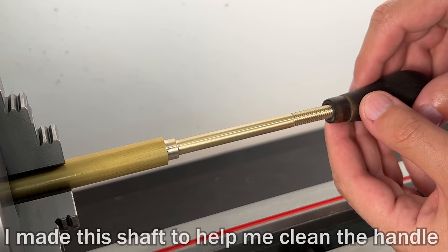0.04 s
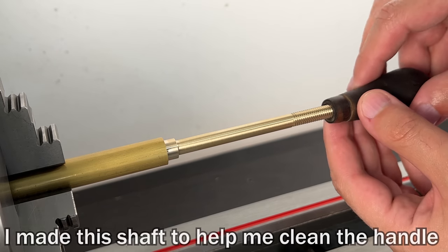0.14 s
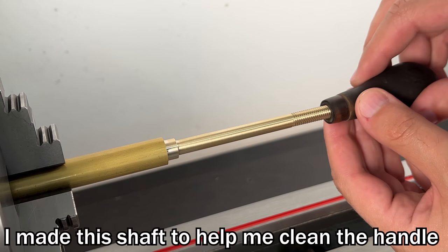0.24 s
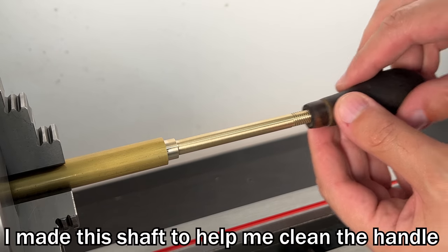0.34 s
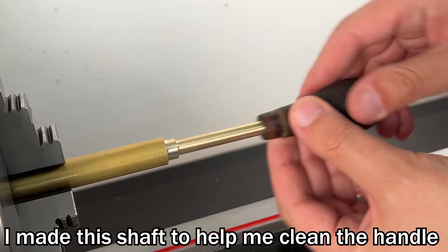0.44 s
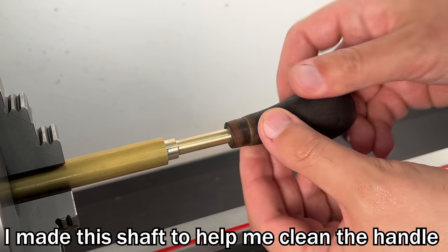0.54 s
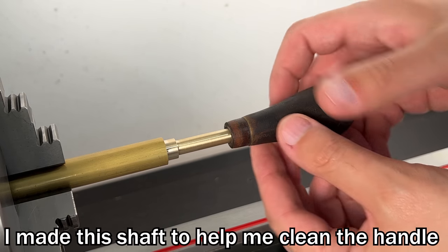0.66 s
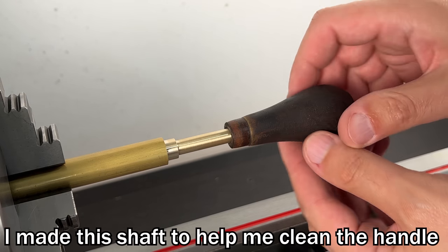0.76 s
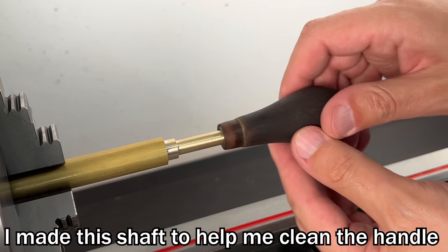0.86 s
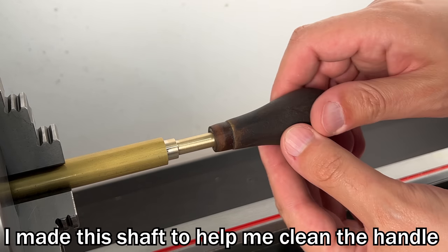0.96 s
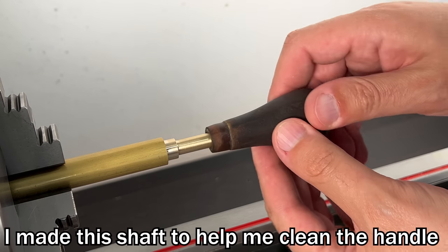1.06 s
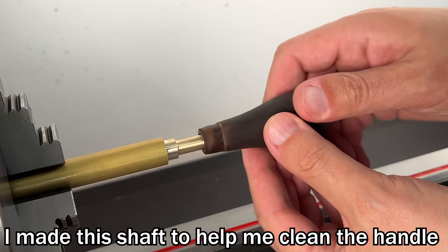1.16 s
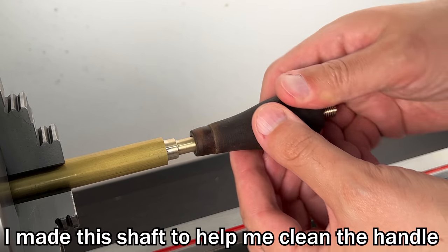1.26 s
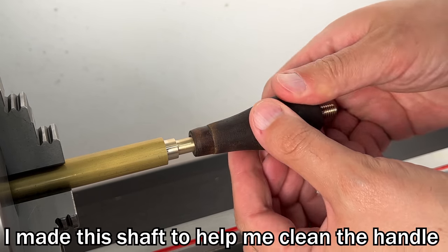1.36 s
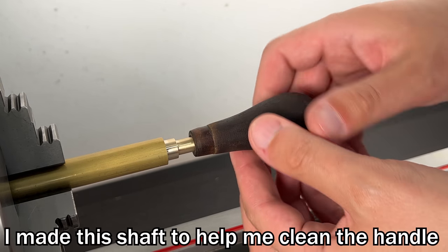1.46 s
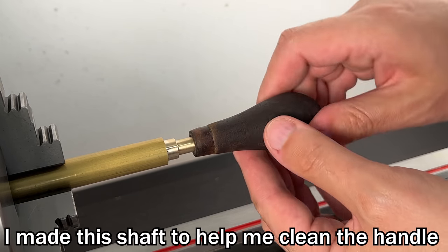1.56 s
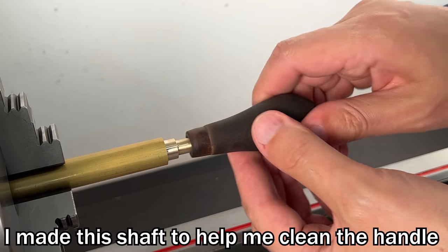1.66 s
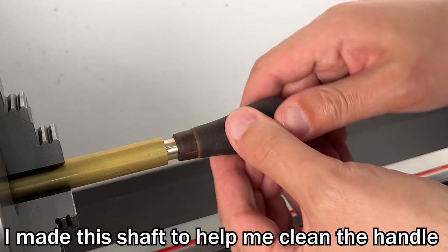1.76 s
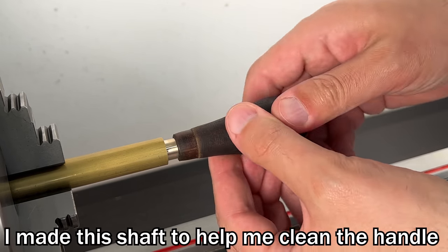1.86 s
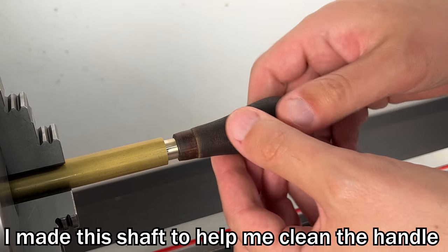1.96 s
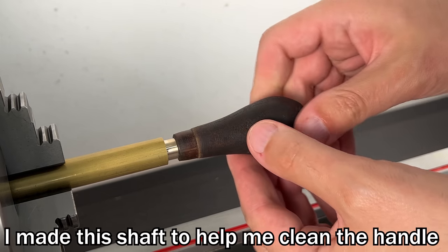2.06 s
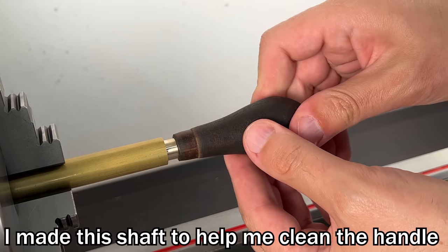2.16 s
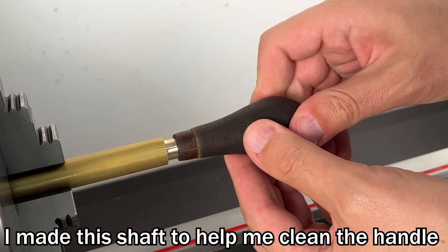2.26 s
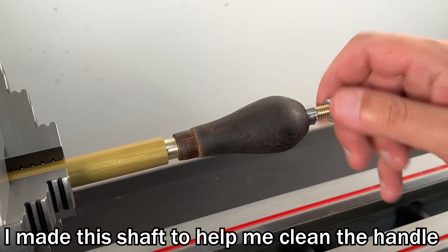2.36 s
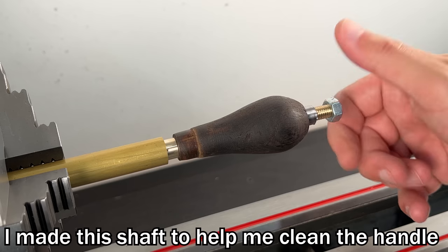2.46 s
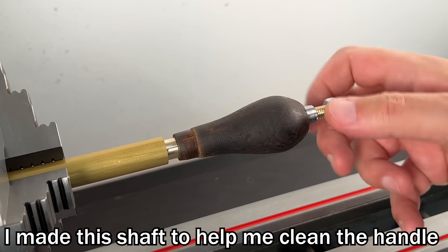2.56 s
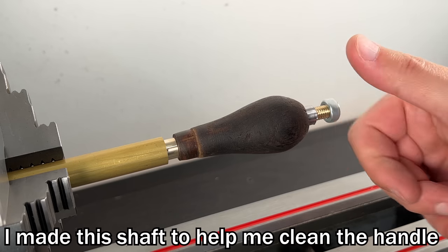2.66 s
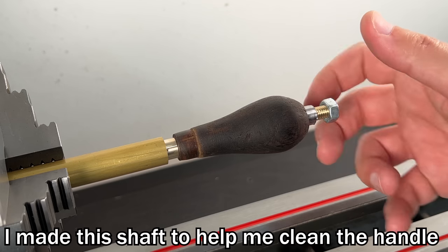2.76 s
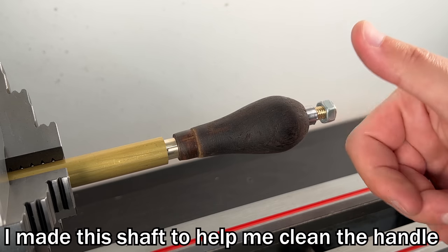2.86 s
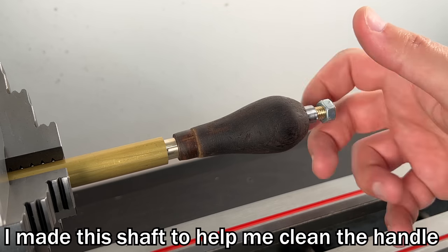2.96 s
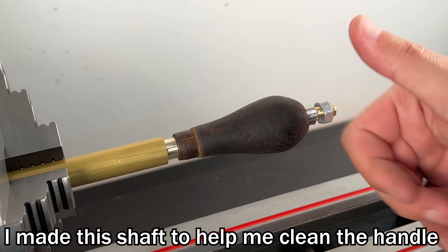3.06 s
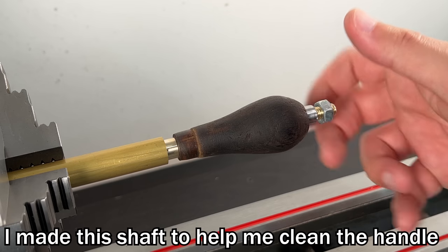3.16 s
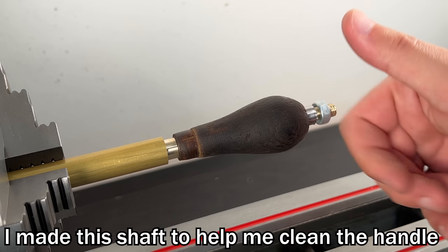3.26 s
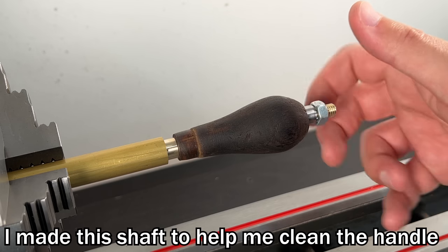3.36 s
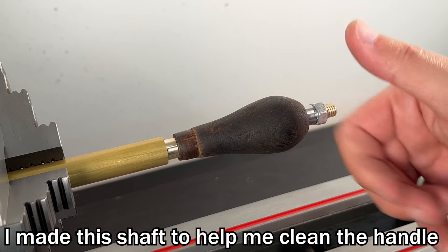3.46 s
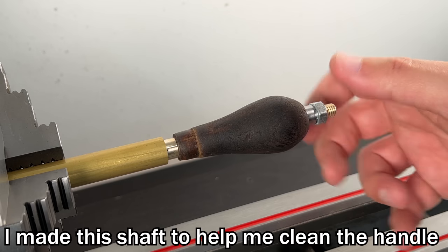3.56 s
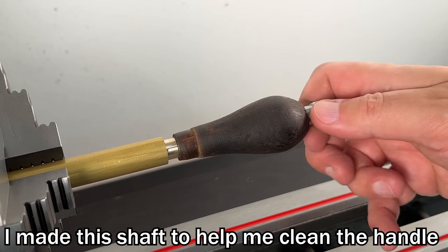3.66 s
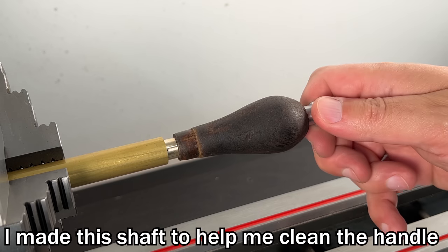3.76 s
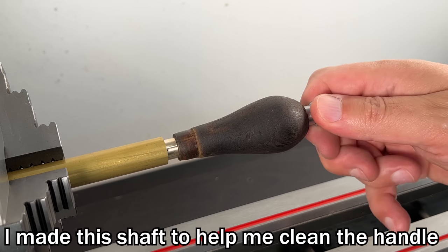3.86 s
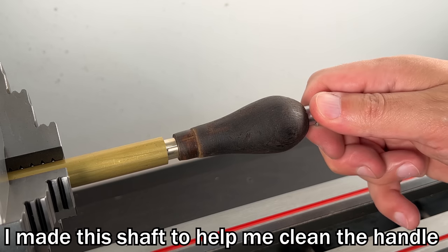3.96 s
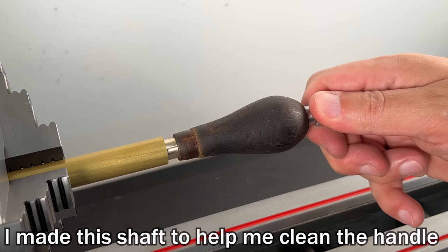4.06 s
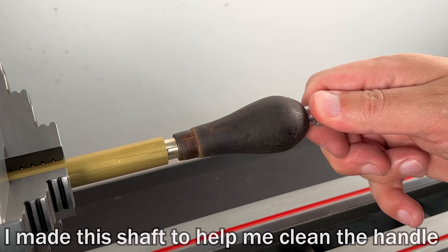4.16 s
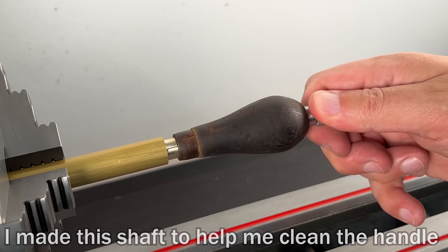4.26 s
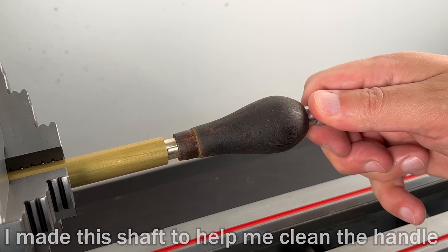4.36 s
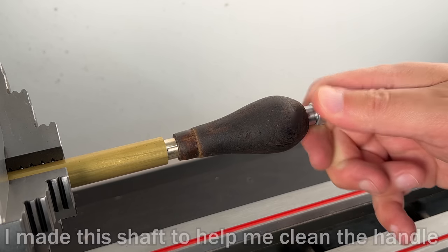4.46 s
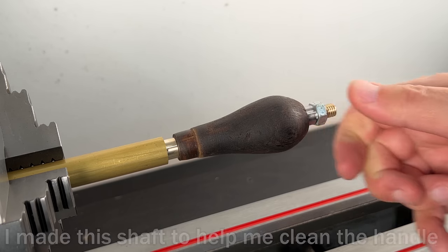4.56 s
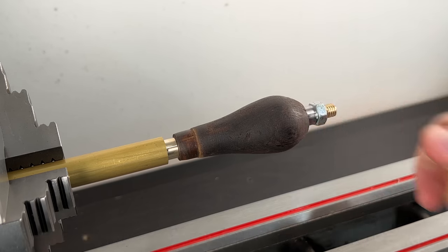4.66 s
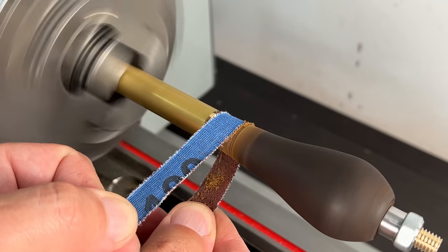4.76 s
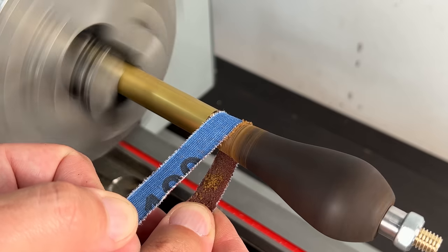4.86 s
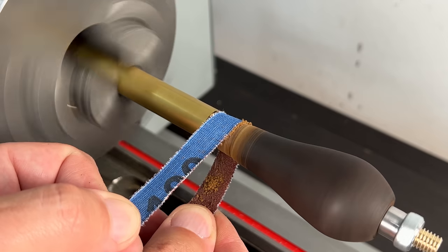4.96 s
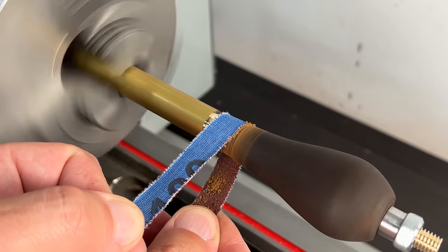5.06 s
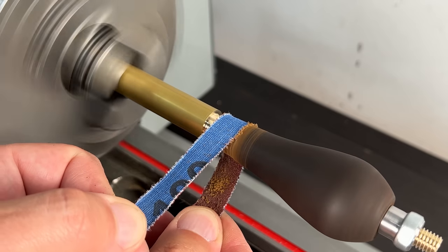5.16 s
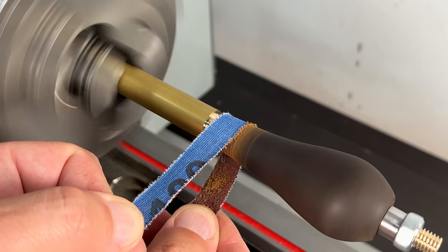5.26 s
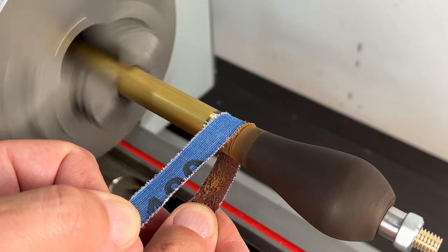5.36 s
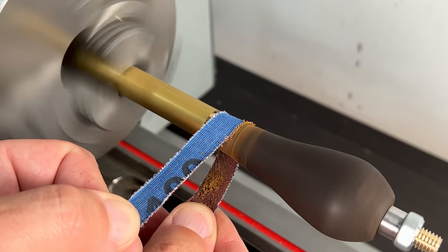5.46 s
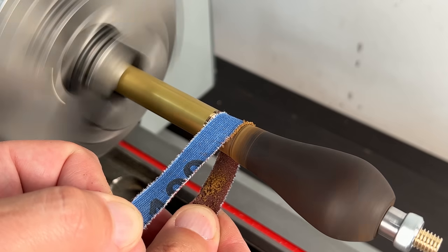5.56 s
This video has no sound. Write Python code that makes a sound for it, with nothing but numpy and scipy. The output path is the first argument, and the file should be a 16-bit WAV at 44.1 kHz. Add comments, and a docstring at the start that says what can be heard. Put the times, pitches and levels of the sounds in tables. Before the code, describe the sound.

A close, dry small-workshop sound with short reflections and faint low air noise. At 0-0.1 s the wooden handle gives soft hollow taps; from 0.3 to about 0.6 s it scrapes along the brass thread, growing hollower, then stops. Light skin rubs and dull wooden knocks follow around 0.9, 1.1-1.3 and 1.5 s. Two firmer knocks at 1.74 and 1.83 s seat it, with a tiny grind and low thud; a dry snap comes at 2.05 s. From 2.4 s a steel nut ticks and chatters on the thread, bright and ringing, in irregular flicks, strongest around 2.65-3.15 s with two brief rattles and low shaft rings, thinning out by 3.5 s. Near quiet follows, with faint bumps at 3.8-4.4 s. From about 4.7 s sandpaper rasps and hisses continuously against the spinning handle, swelling to 5.35 s with harsher bites, a thin singing edge, bearing rumble and low hum, still running at the end.

```python
"""A wooden handle scrapes along a threaded brass shaft and knocks home: filtered grains and ringing modes.
A flicked steel nut ticks and chatters on the thread, and each hit rings and bends the shaft.
Then a lathe swells in: sandpaper rasps as filtered grains over bearing rumble and a sine motor hum.
A small workshop adds close reflections and a short tail, over faint air noise.
"""
import sys
import numpy as np
from scipy import signal
from scipy.fft import rfft, irfft
from scipy.io import wavfile
from scipy.ndimage import uniform_filter1d, map_coordinates

SR = 44100
rng = np.random.default_rng(int(sys.argv[2]) if len(sys.argv) > 2 else 0)


def generate_wav(signal):
    """Clip the signal to [-1, 1] and save it as 16-bit WAV at the path in sys.argv[1]."""
    frames = np.transpose(np.atleast_2d(signal))
    scaled = np.clip(frames, -1, 1) * 32767
    pcm = np.round(scaled).astype(np.int16)
    wavfile.write(sys.argv[1], SR, pcm)


N = 247401
T = np.arange(N) / SR  # s


def handle():
    """The bore scrapes along the thread, skin drags on the wood, and the handle knocks on the shaft."""
    return sliding_bore() + finger_rubs() + handle_knocks() + thread_snaps() + bed_thuds()


# one push: the scrape builds, sags a little and stops (times and sag before the curve is bent)
SLIDE_S, SLIDE_END_S, SLIDE_ATTACK_S, SLIDE_RELEASE_S = 0.31, 0.57, 0.14, 0.057
SLIDE_SAG_DB_PER_S, SLIDE_CURVE = 17, 1.16
# the handle grinds against the shoulder as it seats
SEAT_S, SEAT_RISE_S, SEAT_FALL_S = 1.835, 0.0019, 0.031


def push():
    """Gains of scrape and hollow bore: the bore speaks louder the deeper the shaft goes, then dies away."""
    movement = stroke(SLIDE_S, SLIDE_END_S, SLIDE_ATTACK_S, SLIDE_RELEASE_S, SLIDE_SAG_DB_PER_S)
    rough = amp(-41.5) * movement ** SLIDE_CURVE
    # 11 dB over the scrape gain at the end of the push, 70 dB less for each second away from it
    bore = rough * amp(11 - 70 * np.abs(SLIDE_END_S - T))
    seat = swell(SEAT_S, 0, SEAT_RISE_S, SEAT_FALL_S)
    return rough + amp(-55) * seat, bore + amp(-38) * seat


# spectrum of wood scraping on the thread: f/Hz, level/dB
SCRAPE_COLOUR = [(1120, -14), (1900, -17), (2080, -6.5), (3420, -5), (4020, -11), (4980, -6.5),
                 (6220, -10.5), (9890, -20), (14800, -14.5), (16000, -13.5)]
# spectrum of the hollow bore: f/Hz, level/dB
BORE_COLOUR = [(65, -48), (110, -27), (175, -4.5), (219, 2.5), (372, -13), (465, -3), (606, -15.5),
               (730, -8.5), (780, -23), (844, -11.5), (1030, -21.5), (1380, -14.5), (1680, -9.5),
               (1820, -19), (2600, -22), (3380, -41), (5720, -120)]


def sliding_bore():
    """Sliding wood catches on the thread in tiny contacts, heard as a scrape and a hollow drone."""
    rough, bore = push()
    catching = amp(1.2 * walk(89.5))
    scrape_contacts = catching * wander(grains(6000, 2.4), patchy_db=2.8)
    scrape = rough * amp(-3) * through(scrape_contacts, response(SCRAPE_COLOUR))
    drone_contacts = catching * wander(grains(2000, 2.3), patchy_db=2.0)
    drone = bore * amp(-3.5) * through(drone_contacts, response(BORE_COLOUR))
    return scrape + drone


# fingers rub and turn the handle, one row a stroke, before each layer's trim:
# t/s, length/s, skin hiss level/dB, dragging scuff level/dB, hollow wood level/dB
RUBS = [(0.0, 0.0073, -74, -55.5, -50), (0.765, 0.016, -70.5, -83, -77), (0.887, .14, -63, -58.5, -54),
        (1.101, .14, -67, -67.5, -56), (1.252, .11, -62.5, -67.5, -59.5), (1.458, 0.16, -72.5, -78, -60.5),
        (1.722, 0.099, -57, -57, -46.5), (2.001, 0.13, -74.5, -73, -77)]
RUB_ATTACK_S, RUB_RELEASE_S, RUB_SAG_DB_PER_S = .012, 0.028, 20


def fingers():
    """Gains of skin hiss, scuff and hollow wood: a stroke takes hold quickly, eases and lets go."""
    layers = np.zeros((3, N))
    for s, length, *dbs in RUBS:
        movement = stroke(s, s + length, RUB_ATTACK_S, RUB_RELEASE_S, RUB_SAG_DB_PER_S)
        layers += np.outer(amp(dbs), movement)
    return layers


# spectrum of skin on wood: f/Hz, level/dB
SKIN_COLOUR = [(1410, -37.5), (2400, 3), (3320, 3), (4680, -2.5), (5930, -6), (6740, -13.5), (7650, 2),
               (9180, -12), (9940, -15), (16000, -58)]
# broad hiss bands of skin on the hollow handle: f/Hz, t60/s, level/dB
SKIN_MODES = [(2380, .01, 10.5), (3460, 0.025, 0), (4230, 0.001, -35.5), (5730, 0.016, 9), (6180, 0.016, 6),
              (7480, 0.0087, -1), (8670, 0.024, 2)]
# modes of the handle on its shaft, also heard in the knocks: f/Hz, t60/s, level/dB
HANDLE_MODES = [(232.7, 0.13, 1), (298, 0.065, 6), (363, 0.1, -0.5), (456, 0.16, -5), (780, 0.062, -13)]


def finger_rubs():
    """Skin sticks and slips in fine contacts that brush, scuff and excite the hollow wood."""
    skin, drag, hollow = fingers()
    friction = amp(1.0 * walk(45)) * wander(grains(8000, 2.8), patchy_db=1.5)
    brush = amp(-3.0) * through(skin * friction, response(SKIN_COLOUR))
    brush += amp(-5.5) * through(skin * friction, ring(SKIN_MODES))
    scuff_modes = [(1160, 0.0026, -14.0), (1518, 0.021, 5.0), (2030, 0.0026, 13)]  # f/Hz, t60/s, level/dB
    scuff = amp(-6.0) * through(drag * friction, ring(scuff_modes, low_hz=780))
    body = hollow * amp(-6.5) * through(grains(900, 1.5), ring(HANDLE_MODES))
    return brush + scuff + body


# the handle knocks on the shaft: t/s, wooden thud level/dB, hardness as click level over thud/dB
KNOCKS = [(0.011, -57, -10), (.059, -53.5, -1), (0.313, -49, -2.5), (0.898, -60.5, 5), (1.086, -47.5, -21),
          (1.114, -44.5, -34), (1.159, -52.5, -19), (1.264, -52.5, -12), (1.486, -51, -3),
          (1.735, -39.5, -1.5), (1.831, -35, 5.5), (2.056, -44.5, -4.5), (3.83, -63.5, -1)]
# higher modes of the shaft, damped by the wood: f/Hz, t60/s, level/dB
DAMPED_SHAFT_MODES = [(1666, 0.14, -9), (1609, 0.046, 11.5), (1806, 0.2, -10.5), (2760, 0.033, 4.5),
                      (3360, 0.17, -17.5)]
# spectrum of the contact click: f/Hz, level/dB
CLICK_COLOUR = [(250, -5), (450, -14.5), (1100, -7.5), (1600, -2.5), (2400, -16), (3400, -7.5),
                (7000, -21.5), (16000, -26)]


def handle_knocks():
    """Each knock thuds in the wood, clicks at the contact and rings the shaft, more so when harder."""
    s, thud_db, hardness_db = np.transpose(KNOCKS)
    ring_db = thud_db - 5.5 + 0.36 * hardness_db
    thuds = knock(s, thud_db, HANDLE_MODES, detune=0.021, vary_db=4.0, contact_s=0.008)
    rings = knock(s, ring_db, DAMPED_SHAFT_MODES, detune=0.014, vary_db=0.0, contact_s=0.0061)
    # each contact crunches for a few milliseconds
    burst = rng.standard_normal(N) * np.exp(-T / 0.0031)
    crunch = through(burst, response(CLICK_COLOUR))[:SR // 10]
    return thuds + rings + strike(s, thud_db + hardness_db, crunch)


# the bore slips over a thread crest: t/s, peak level/dB
SNAPS = [(.059, -56), (1.736, -61), (1.837, -48), (2.055, -39)]


def thread_snaps():
    """Slipping over a thread crest gives a dry snap of bright, quickly fading noise."""
    burst = rng.standard_normal(N) * np.exp(-T / 0.0022)
    return strike(*np.transpose(SNAPS), highpass(burst, 2500)[:SR // 10])


# pushes that shake the lathe bed: t/s, peak level/dB
THUDS = [(1.831, -45.5), (2.324, -55.5), (2.441, -52.5), (2.873, -52), (3.811, -63), (4.192, -60.5),
         (4.401, -62)]
# modes of the bed: f/Hz, t60/s, level/dB
BED_MODES = [(68.4, 0.16, -3.5), (99, 0.88, -9.5), (130, 0.16, 3)]


def bed_thuds():
    """A push sets the heavy bed ringing in a few low modes."""
    return strike(*np.transpose(THUDS), ring(BED_MODES, low_hz=55))


# the flicked nut ticks on the thread and chatters on: t/s, tick peak level/dB, chatter level/dB
TICKS = [(2.387, -44, -67), (2.422, -52, -56), (2.438, -39.5, -51), (2.458, -38, -46), (2.507, -31, -45),
         (2.674, -25, -42.5), (2.699, -30, -43.5), (2.732, -42.5, -57), (2.75, -37.5, -53.5),
         (2.8716, -25.5, -42.5), (2.897, -43.5, -43), (2.9102, -19.5, -44), (2.934, -33, -44),
         (3.069, -28.5, -50), (3.097, -42.5, -47.5), (3.111, -29.5, -49), (3.135, -19, -46),
         (3.282, -27.5, -41.5), (3.321, -30, -44.5), (3.378, -37, -54.5), (3.486, -31.5, -43),
         (3.51, -32, -50.5)]
# firm flicks throw the nut into a rattle: t/s, rattle level/dB, bend level/dB, shudder level/dB
THROWS = [(2.947, -27.5, -26.5, -43.5), (3.141, -28, -23.5, -36), (3.525, -65, -45.5, -53)]
CHATTER_RISE_S, CHATTER_FALL_S = 0.0089, .012
THROW_RISE_S, THROW_FALL_S = .006, 0.0084


def nut_force():
    """Gain of the nut's contacts: it builds just after each tick, peaks at each throw and dies away."""
    force = np.zeros(N)
    for s, _, db in TICKS:
        force += amp(db) * stroke(s, s + CHATTER_RISE_S, CHATTER_RISE_S, CHATTER_FALL_S)
    for s, rattle_db, _, _ in THROWS:
        force += swell(s, rattle_db, THROW_RISE_S, THROW_FALL_S)
    return force


# modes of the nut: f/Hz, t60/s, level/dB
NUT_MODES = [(4190, 0.012, -1), (4665, 0.0089, 2.5), (4994, 0.028, -6), (5900, 0.0058, -0.5),
             (6950, 0.012, -12.5), (10260, 0.011, -21.5)]
# the brass shaft rings under the nut: f/Hz, t60/s, level/dB
SHAFT_MODES = [(342, 1, -10.5), (447, .15, -13), (1293, 0.51, -6), (1590, .14, -10), (1700, 0.18, 9.5),
               (1676, .08, -5.5), (4040, 0.18, -3.5), (4015, .2, -17.5), (4560, 0.057, -8), (4500, .07, 2),
               (6374, 0.11, -22), (7240, 0.055, -6.5), (10410, 0.058, 4), (10820, .1, -10)]
# spectrum of the chatter: f/Hz, level/dB
CHATTER_COLOUR = [(290, -14), (500, -0.5), (640, -18), (1090, -26), (1690, -1.5), (2260, -19), (3440, -12),
                  (3860, -6), (5970, -17.5), (6230, -8), (8330, -19), (10200, -20), (14500, -29),
                  (16000, -19)]


def nut():
    """Each flick ticks the loose nut on the thread; it chatters as it spins and sets the shaft ringing."""
    s, tick_db, _ = np.transpose(TICKS)
    ticks = knock(s, tick_db, NUT_MODES, detune=0.028, vary_db=5.5, contact_s=0.0015)
    pings = amp(-24.5) * knock(s, tick_db, SHAFT_MODES, detune=.01, vary_db=1.5, contact_s=.004)
    # steel meets brass with a brief broad click
    burst = rng.standard_normal(N) * np.exp(-T / .002)
    clicks = strike(s, tick_db - 12.0, highpass(burst, 2000)[:SR // 10])
    force = nut_force()
    contacts = force * amp(2.4 * walk(300)) * wander(grains(6000, 1.6), patchy_db=3.0)
    chatter = amp(1.5) * through(contacts, response(CHATTER_COLOUR))
    # the harder the nut is thrown, the more treble in its contacts
    zing = amp(-12.0) * highpass(contacts * np.sqrt(force / force.max()), 6000)
    shaft = amp(-12.0) * through(contacts, ring(SHAFT_MODES))
    return highpass(ticks + clicks + pings + chatter + zing + shaft + shaft_shudder(), 200) + shaft_bumps()


# spectrum of the shaft shuddering in the chuck: f/Hz, level/dB
SHUDDER_COLOUR = [(110, -38.5), (190, -17.5), (312, -3.5), (359, -7.5), (402, -13), (473, -23.5),
                  (639, -27), (833, -19), (1070, -27.5), (1420, -23.5), (1550, -22), (1910, -26.5),
                  (3000, -35), (3900, -67.5), (6600, -120)]


def shaft_shudder():
    """The shaft shudders in the chuck just after a throw, as a short burst of coloured grains."""
    lag_s, rise_s, fall_s = 0.012, .006, 0.033
    shaking = sum(swell(s + lag_s, db, rise_s, fall_s) for s, _, _, db in THROWS)
    return through(shaking * grains(1700, 1.2), response(SHUDDER_COLOUR))


# bending modes of the loaded shaft: f/Hz, t60/s, level/dB
BEND_MODES = [(247.5, 0.11, 1), (280.2, 0.11, 5), (295, 0.46, -4), (335.5, 0.69, -8.5), (470, 0.17, -7)]


def shaft_bumps():
    """Ticks and throws bend the loaded shaft, which rings low."""
    s, tick_db, _ = np.transpose(TICKS)
    throw_s, _, bend_db, _ = np.transpose(THROWS)
    times = np.append(s + .003, throw_s)  # a tick's bump lags it by 3 ms
    levels_db = np.append(tick_db - 16.5, bend_db)
    return knock(times, levels_db, BEND_MODES, detune=0.0013, vary_db=3.5, contact_s=0.0036)


# the sanding swells in, before each layer's trim: t/s, level/dB
SANDING = [(4.41, -105), (4.422, -78.5), (4.718, -57), (5.172, -41), (5.354, -37), (5.6, -37)]
MOTOR_HZ = 59.2


def lathe():
    """Sandpaper, rumble and motor hum share one swell; the paper's bites have their own times and levels."""
    swelling = gains(SANDING)[0]
    motor = amp(-19) * swelling * unit(np.sin(2 * np.pi * MOTOR_HZ * T))
    return swelling * sandpaper() + paper_bites() + amp(-8) * swelling * bearings(), motor


# spectrum of the rasp: f/Hz, level/dB
RASP_COLOUR = [(440, -37), (750, -18.5), (1030, 2.5), (1240, -4.5), (1540, 2), (1910, -2.5), (2350, -5),
               (2800, -3), (3220, -8), (4350, -11), (5240, -9), (5650, -13.5), (7000, -17), (9100, -36.5),
               (15400, -120)]
# modes of the sanded workpiece: f/Hz, t60/s, level/dB
WORKPIECE_MODES = [(919, 0.12, -12), (1049, 0.069, -0.5), (1347, 0.12, -6), (1560, 0.23, -7.5),
                   (1639, 0.1, -4.5), (1820, 0.12, -6), (1968, 0.15, -5), (2740, 0.067, -17),
                   (2750, 0.087, -5), (2845, 0.073, -2)]
# spectrum of the grit hiss: f/Hz, level/dB
GRIT_COLOUR = [(3240, -26), (5500, -6.5), (7320, -5), (7970, 0), (8600, -1.5), (9360, -1.5), (12300, 2),
               (14000, -3), (15200, -1), (16000, -2.5)]
TURN_HZ, SING_HZ = 14.5, 5088


def sandpaper():
    """Dense grit contacts rasp and hiss, ring the workpiece and make the strip sing in a thin band."""
    # the paper's pressure throbs with each turn and wavers with the hand
    pressure_db = 0.19 * np.sin(2 * np.pi * TURN_HZ * T) + 1.1 * walk(50)
    tearing = amp(-2 + pressure_db) * through(grains(7000, 2.4), response(RASP_COLOUR))
    pressed_grains = amp(pressure_db) * grains(5000, 2.1)
    ringing = amp(-7) * through(pressed_grains, ring(WORKPIECE_MODES, low_hz=875))
    flutter = amp(-13.5 + 2.2 * walk(60))
    singing = flutter * through(grains(5000, 3.1), ring([(SING_HZ, .045, 0)]))
    hiss = amp(2.0 + 0.43 * pressure_db) * through(grains(25000, 1.1), response(GRIT_COLOUR))
    return tearing + ringing + singing + amp(-5) * hiss


# the paper bites harder: t/s, level/dB
BITES = [(4.96, -48), (5.08, -39), (5.199, -45), (5.363, -36), (5.435, -34.5), (5.505, -32.5)]


def paper_bites():
    """Each bite swells and fades in grains that excite two short modes."""
    bite_modes = [(1600, 0.0076, 0), (1957, 0.015, -1)]  # f/Hz, t60/s, level/dB
    pressure = sum(swell(s, db, 0.0086, 0.0086) for s, db in BITES)
    return pressure * through(grains(6000, 1.6), ring(bite_modes))


# spectrum of the rumble: f/Hz, level/dB
RUMBLE_COLOUR = [(59, -35), (100, -21.5), (145, -9), (178, -15.5), (227, 0), (263, -5.5), (292, -7),
                 (318, -9.5), (413, -9), (454, -12), (638, -11.5), (766, -21.5), (800, -23), (1040, -31),
                 (1760, -120)]
# droning modes of the headstock: f/Hz, t60/s, level/dB
HEADSTOCK_MODES = [(218.7, 0.15, -4), (232.5, 0.25, 2), (294.4, 0.25, -8), (469, 0.17, 4)]


def bearings():
    """Rolling noise wavers and rumbles; grains keep the headstock droning."""
    rolling = amp(1.5 * walk(25)) * rng.standard_normal(N)
    rumble = amp(-0.5) * through(rolling, response(RUMBLE_COLOUR))
    return rumble + amp(-10) * through(grains(2000, 2), ring(HEADSTOCK_MODES))


def workshop(x, wet_db, side_db, comb_db, pan_db, low_t60=0.49, high_t60=0.32, spread_s=0.024):
    """The room's tail, shorter in the treble, and early reflections from left and right."""
    t = T[:SR * 3 // 4]
    noise = rng.standard_normal((2, len(t)))
    low = signal.sosfilt(signal.butter(2, 2200, fs=SR, output="sos"), noise)
    high = signal.sosfilt(signal.butter(1, [2200, 9000], "bandpass", fs=SR, output="sos"), noise)
    tail = (low * amp(-60 * t / low_t60) + high * amp(-60 * t / high_t60)) * (t > .006)
    mid, side = (amp(wet_db) * through(x, h) for h in tail)
    early = rng.standard_normal(len(t)) * np.exp(-t / spread_s)
    # hard machine faces close by comb the treble
    faces = rng.standard_normal(len(t)) * np.exp(-t / 0.0076) * (t > .001)
    mid = mid + amp(comb_db) * highpass(through(x, faces), 1200)
    # the two capsules sit close together: bass reaches both alike
    side = highpass(amp(-8.5) * side + amp(side_db) * through(x, early), 230)
    return np.array([amp(pan_db / 2) * (x + mid + side), amp(-pan_db / 2) * (x + mid - side)])


# spectrum of the air noise: f/Hz, level/dB
FLOOR_COLOUR = [(15, -32.5), (25, -8.5), (76, -6.5), (102, -16), (134, -3.5), (195, -20), (293, -15),
                (405, -23.5), (2690, -35.5), (2910, -35.5), (4250, -37), (14800, -39), (16000, -44)]


def room_tone():
    """Low, slowly wavering air noise with a faint hiss."""
    mid, side = (through(rng.standard_normal(N), response(FLOOR_COLOUR)) for _ in range(2))
    side = amp(-5.5) * highpass(side, 500, order=1)
    return amp(-69.5 + 1.1 * walk(6)) * np.array([mid + side, mid - side])


def amp(db):
    """Decibels to gain."""
    return 10 ** (np.asarray(db) / 20)


def unit(x):
    """Scale to rms 1."""
    return x / np.sqrt(np.mean(x ** 2))


def gains(table):
    """One smoothed gain curve for each dB column, near silent before the table begins."""
    s, *columns = np.transpose(table)
    return [uniform_filter1d(amp(np.interp(T, s, c, left=-140)), size=400) for c in columns]


def response(points):
    """Causal (minimum-phase) impulse response of unit energy with the given f/Hz, level/dB spectrum."""
    hz, db = np.transpose(points)
    size = 8192
    bins = np.maximum(np.fft.rfftfreq(size, 1 / SR), 1)
    spectrum_db = np.interp(np.log(bins), np.log(hz), db)
    # folding the cepstrum forward in time makes the response causal
    cepstrum = irfft(np.log(amp(spectrum_db)))
    cepstrum[1:size // 2] *= 2
    cepstrum[size // 2 + 1:] = 0
    h = irfft(np.exp(rfft(cepstrum)))
    return h / np.linalg.norm(h)


def ring(modes, low_hz=185):
    """Impulse response of decaying modes, peak 1; small parts radiate no deep bass."""
    t = T[:SR // 3]
    h = sum(amp(db - 60 * t / t60) * np.sin(2 * np.pi * hz * t) for hz, t60, db in modes)
    h = highpass(h, low_hz, order=4)
    return h / np.abs(h).max()


def through(x, h):
    """Send x through a body with impulse response h, keeping the power of white noise."""
    return signal.oaconvolve(x, h / np.linalg.norm(h))[:N]


def strike(times, dbs, h):
    """Sound the response h at each time with the given peak level."""
    out = np.zeros(N + len(h))
    for s, db in zip(times, dbs):
        start = int(s * SR)
        out[start:start + len(h)] += amp(db) * h / np.abs(h).max()
    return out[:N]


def knock(times, dbs, modes, detune, vary_db, contact_s):
    """Every blow lands on another spot and with another grip: its modes shift in pitch and strength."""
    out = np.zeros(N)
    hz, t60, mode_db = np.transpose(modes)
    for s, db in zip(times, dbs):
        shift, strength = rng.standard_normal((2, len(hz)))
        h = ring(zip(hz * (1 + detune * shift), t60, mode_db + vary_db * strength))
        # the ring builds up while the parts stay in touch
        build_up = 1 - np.exp(-T[:len(h)] / contact_s)
        out += strike([s], [db], h * build_up)
    return out


def grains(rate, spread_db):
    """Tiny random contacts, about `rate` a second, of uneven size and either sign, rms 1."""
    chance = rng.random(N)
    size = np.minimum(rng.exponential(size=N), 4)
    sign = np.sign(rng.standard_normal(N))
    return unit((chance < rate / SR) * amp(spread_db * size) * sign)


def walk(rate):
    """Random curve joining `rate` points a second by straight lines, spread near 1."""
    return np.interp(T * rate, np.arange(4096), rng.standard_normal(4096)) * np.sqrt(1.5)


def wander(x, patchy_db, span_s=.025, span_hz=170):
    """The point of contact keeps moving, so narrow bands flare and fade each on their own."""
    hz, t, z = signal.stft(x, SR, nperseg=512, noverlap=384)
    rows, columns = np.meshgrid(hz / span_hz, t / span_s, indexing="ij")
    field = map_coordinates(rng.standard_normal((256, 1024)), [rows, columns], order=1, mode="wrap")
    patches = unit(amp(patchy_db * unit(field)))
    return signal.istft(z * patches, SR, nperseg=512, noverlap=384)[1][:N]


def swell(s, db, rise, fall):
    """A gain that grows towards time s and dies away after it."""
    return amp(db) * np.exp(-np.maximum((s - T) / rise, (T - s) / fall))


def stroke(s, end, attack, release, sag_db=0):
    """Gain of one movement: it builds from time s, sags by sag_db a second and dies away after its end."""
    age = np.maximum(T - s, 0)
    fade = np.exp(-np.maximum(T - end, 0) / release)
    return np.minimum(age / attack, 1) * amp(-sag_db * age) * fade


def highpass(x, hz, order=2):
    """Take out the bass below hz."""
    return signal.sosfilt(signal.butter(order, hz, "highpass", fs=SR, output="sos"), x)


def scene():
    """Handle, nut and sanding in the workshop, with the motor hum and the room tone added directly."""
    sanding, hum = lathe()
    handle_in_room = workshop(handle(), wet_db=-13, side_db=-11.0, comb_db=-7, pan_db=0.55)
    nut_in_room = workshop(nut(), wet_db=-12.5, side_db=-12.5, comb_db=-15.5, pan_db=1.36)
    sanding_in_room = workshop(sanding, wet_db=-16.5, side_db=-10.5, comb_db=-18.0, pan_db=0.1)
    return handle_in_room + nut_in_room + sanding_in_room + hum + room_tone()


def record(dry):
    """A steep low-pass cuts the top above 15.8 kHz."""
    return signal.sosfilt(signal.ellip(10, .2, 70, 15800, fs=SR, output="sos"), dry)


dry = scene()
out = record(dry)
generate_wav(out)
```